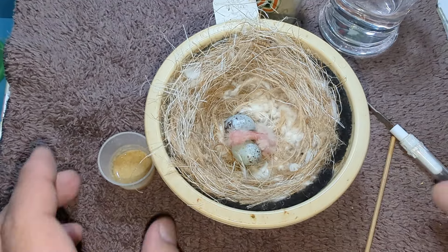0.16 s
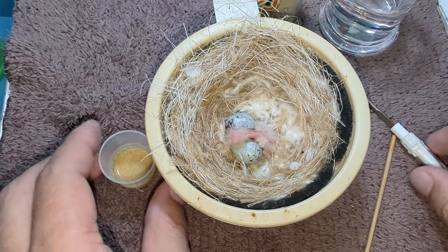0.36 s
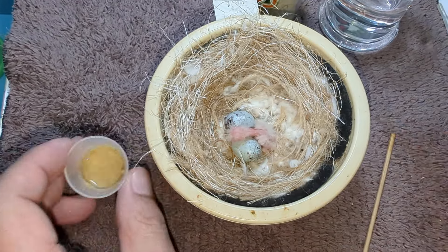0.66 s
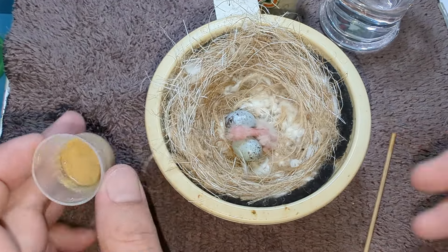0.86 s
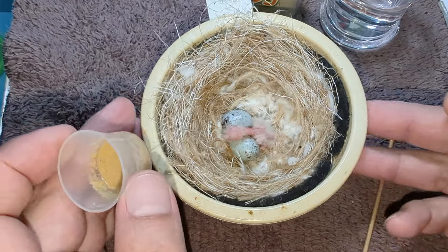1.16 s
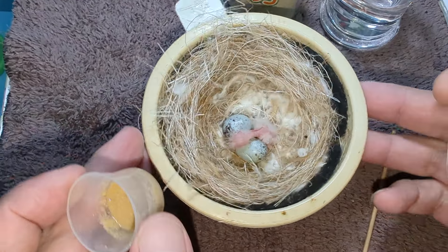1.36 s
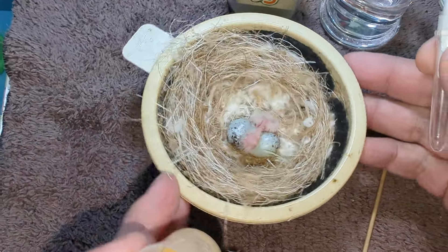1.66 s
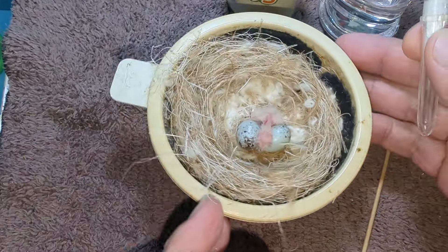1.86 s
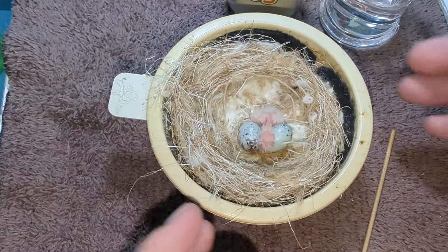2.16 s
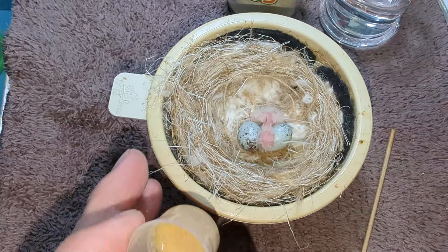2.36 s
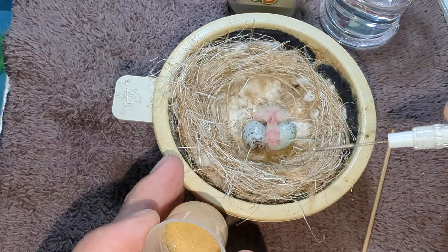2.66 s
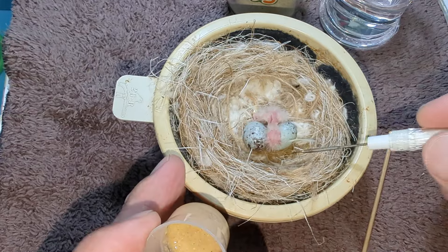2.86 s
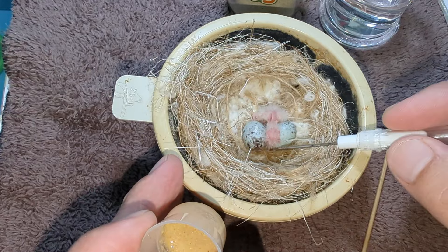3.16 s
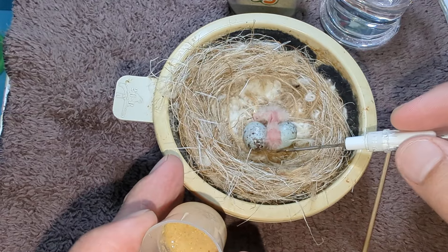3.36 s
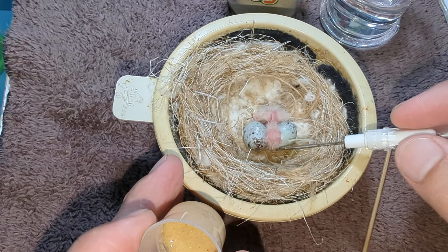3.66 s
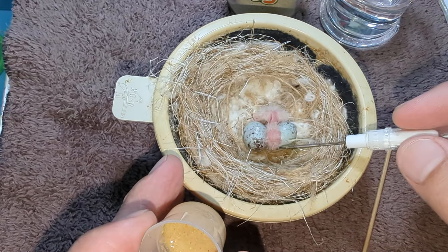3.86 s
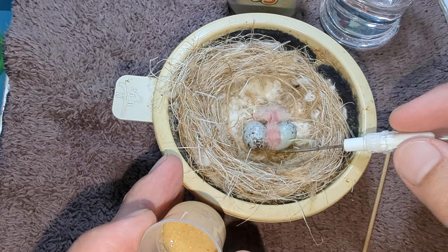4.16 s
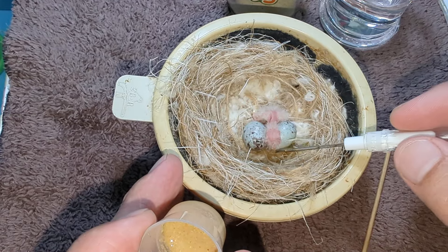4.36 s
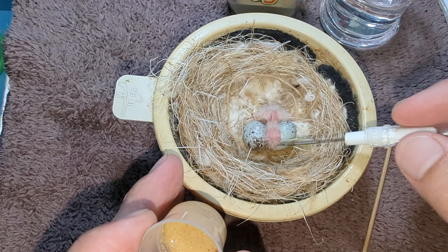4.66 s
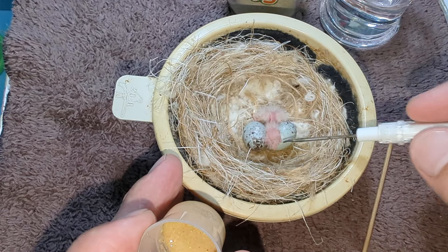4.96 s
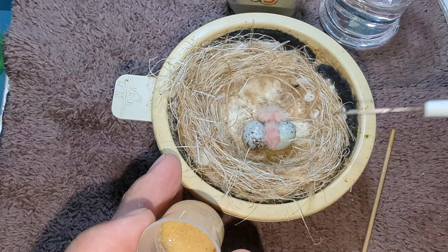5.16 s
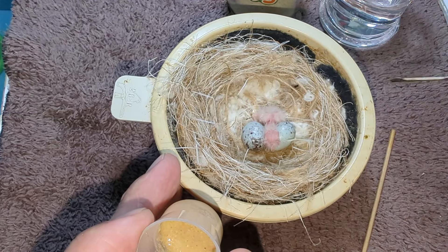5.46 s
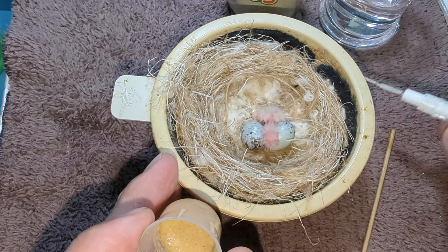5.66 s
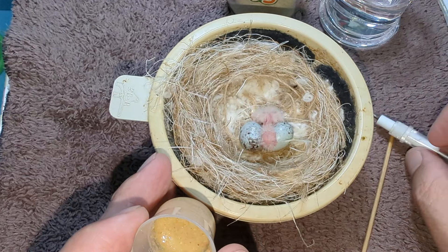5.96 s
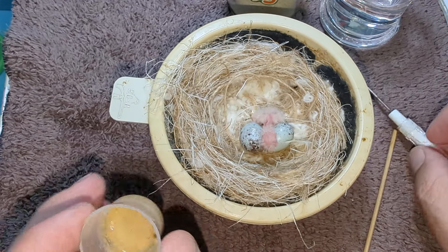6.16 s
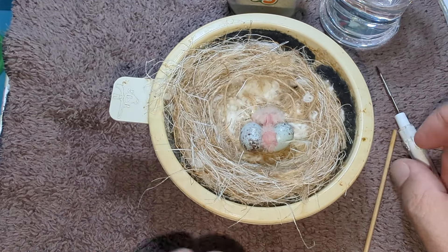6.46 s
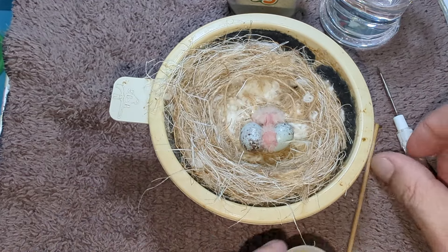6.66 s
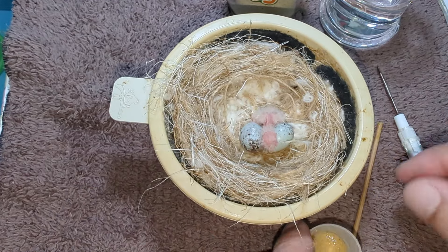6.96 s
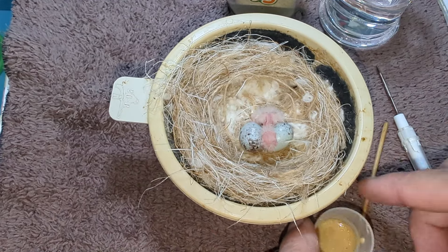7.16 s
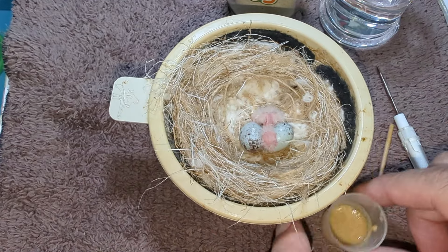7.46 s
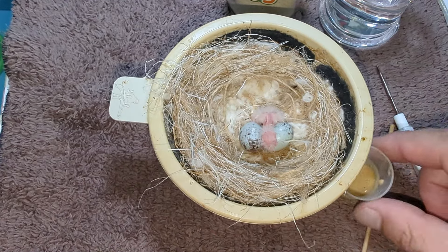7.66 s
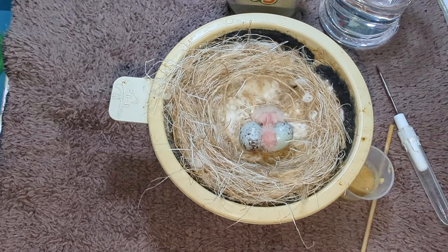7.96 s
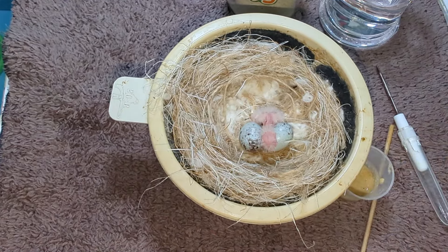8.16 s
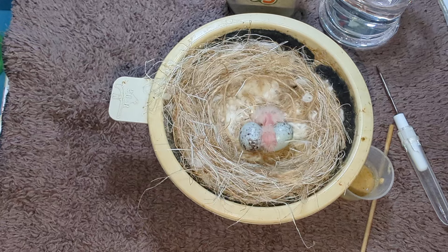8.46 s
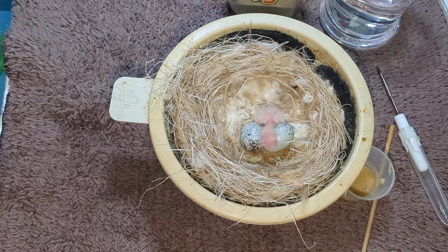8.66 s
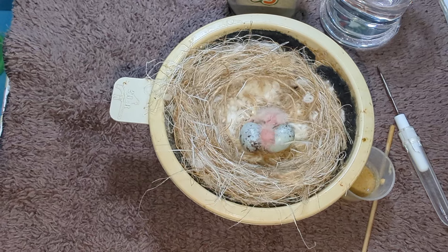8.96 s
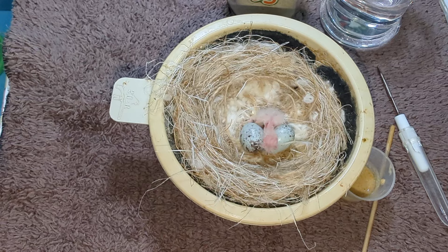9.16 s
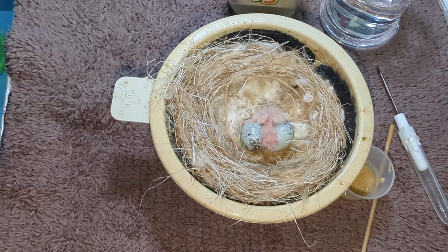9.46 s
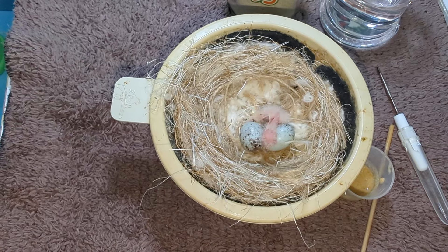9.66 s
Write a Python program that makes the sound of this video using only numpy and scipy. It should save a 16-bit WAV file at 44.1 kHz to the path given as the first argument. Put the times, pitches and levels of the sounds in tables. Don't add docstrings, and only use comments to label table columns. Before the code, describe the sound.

Faint high bird peeps over a low rumble, then a quick run of hard clicking raps with straw crackle, and scattered rising whistles afterwards.

```python
import sys
import numpy as np
from scipy import signal
from scipy.fft import rfft, irfft, next_fast_len
from scipy.io import wavfile
from scipy.ndimage import uniform_filter1d

SR = 44100
rng = np.random.default_rng(int(sys.argv[2]) if len(sys.argv) > 2 else 0)


def attenuation_scalar(level_db):
    decades = np.asarray(level_db, float) / 20
    return 10 ** decades


def to_wav(sig):
    pcm = np.clip(np.atleast_2d(sig), -1, 1) * 32767
    pcm = np.round(pcm).astype(np.int16)
    wavfile.write(sys.argv[1], SR, pcm.T)


N = 432621

# time in seconds, level in dB.
TRAFFIC_LEVEL = [(0.0, -55), (1.04, -52.5), (2.05, -54.5), (3.3, -54), (4.12, -52), (4.8, -49.5),
                 (5.3, -52.5), (6.36, -53), (7.59, -54.5), (8.03, -57.5), (8.93, -55.5), (9.81, -54.5)]
# frequency in Hz, level in dB.
TRAFFIC_TONE = [(15, -43.5), (25, -6), (37, -11), (59, 9), (87, -9.5), (118, -2), (144, -15), (157, -18.5),
                (171, -7), (186, -13), (205, -52), (226, -10.5), (268, -11.5), (385, -19), (450, -20.5),
                (580, -47), (990, -120)]
# frequency in Hz, level in dB.
AIR_TONE = [(210, -52), (350, -11), (482, -5.5), (613, -4), (664, -4.5), (928, -3), (1040, -4), (1680, -5),
            (2710, -7.5), (5660, -20), (6330, -13), (8710, -22), (10100, -32), (14500, -49), (16000, -27)]
AIR_DB = -56.5
# frequency in Hz, likeness from 0 to 1.
PORT_LIKENESS = [(30, 1), (80, 0.92), (300, 0.91), (450, 0.56), (800, 0.45), (1300, 0.068), (2500, 0.22),
                 (6000, 0.037), (15000, 0.06)]
# frequency in Hz, lag in radians.
FLOOR_LAG = [(60, 0.37), (170, 0.53), (400, 0.37), (650, 1.56), (1000, 2.5), (1300, -1.5), (2000, 4),
             (4000, 12)]
# frequency in Hz, width in Hz, level in dB.
MACHINE_HUM = [(104.2, 9, -59.5), (119, 6.7, -64.5), (247, 23, -72), (560, 48, -72), (823, 130, -66),
               (950, 23, -68.5)]
# frequency in Hz, level in dB.
MOTOR_TONES = [(175, -70), (618.8, -71), (738, -73)]

# time in seconds, rustle level in dB.
HANDS = [(0, -76.5), (2.3, -74.5), (2.85, -84), (2.95, -63), (3.5, -73.5), (4.5, -71), (5.0, -72),
         (6.1, -78), (6.6, -77), (7.1, -84.5), (7.5, -77.5), (8.2, -82), (9.81, -101)]
# loudest moment in seconds, level in dB, swell and fade in seconds.
STROKES = [(.52, -67.5, 0.067, 0.35), (1.66, -72, .12, .05), (3.17, -79, .1, .2), (3.38, -72, .1, .1),
           (5.83, -72, .05, .12), (1.96, -67, 0.43, 0.029), (2.34, -73, 0.15, 0.2),
           (2.72, -62.5, 0.054, 0.11), (3.66, -67, 0.1148, 0.2), (4.62, -63.5, 0.031, 0.25),
           (5.14, -74, 0.0831, 0.386), (5.42, -69, .03, .15), (5.58, -61, 0.024, 0.1078),
           (5.71, -63.5, 0.016, 0.056), (6.06, -66.5, 0.54, 0.099), (6.31, -75.5, 0.042, 0.09),
           (7.44, -72, 0.08, 0.0949), (7.56, -70, 0.079, 0.31), (7.97, -75.5, .05, 0.353),
           (8.31, -67, 0.0548, 0.1208), (8.61, -74.5, 0.074, 0.2), (9.1, -74.5, 0.44, 0.76),
           (9.56, -73.5, 0.0876, 0.17)]
# frequency in Hz, level in dB per Hz.
RUSTLE_TONE = [(880, -29), (1500, -10), (1710, 9.5), (1850, 2), (3450, 0), (4970, -2.5), (5600, -1),
               (8830, 2), (10000, -2.5), (13700, -5.5), (16000, -11)]

# top in seconds, level in dB, top pitch in Hz, overtone in dB, hold in seconds.
ARCHES = [(0.281, -57, 5120, -34, 0.012), (1.038, -56.5, 5590, -27.5, 0.0086),
          (1.221, -56.5, 5480, -27.5, 0.014), (3.04, -50, 5300, -31, 0.015),
          (4.139, -53.5, 5500, -15.5, 0.0047), (4.361, -52, 5820, -9.5, 0.0054),
          (4.652, -53, 5490, -18.5, 0.0088), (4.809, -53.5, 5500, -10, 0.011),
          (4.933, -52.5, 5460, -9.5, 0.014), (5.058, -51.5, 5140, -8.5, .012),
          (5.182, -51, 5190, -7, 0.013), (5.308, -52, 5170, -7, 0.011), (5.42, -51, 5020, -8.5, 0.014),
          (5.541, -52, 5160, -11, 0.012), (5.667, -54, 5380, -14, 0.015), (5.804, -52, 5050, -11.5, 0.019),
          (5.948, -51, 5170, -10.5, 0.0105), (9.132, -55, 5080, -24, 0.017),
          (9.253, -54.5, 4980, -17.5, 0.02)]
# top in seconds, level in dB, top pitch in Hz, overtone in dB.
PIPS = [
    (3.381, -53.5, 5430, -16),
    (1.579, -59, 5430, -5),
    (1.705, -58, 5600, -6),
    (1.837, -59, 5300, -8),
    (1.948, -59.5, 5370, -3),
    (2.086, -60.5, 5260, -6),
    (2.241, -58.5, 5140, -7),
]
# top in seconds, level in dB, top pitch in Hz, overtone in dB.
SLURS = [
    (6.82, -62, 4880, -24),
    (6.952, -59.5, 5100, -19),
    (7.112, -65, 4980, -20),
    (6.125, -70, 4950, -20),
    (6.27, -65, 4950, -20),
    (6.39, -69, 4600, -18),
    (6.51, -66, 4900, -17),
]
# top in seconds, level in dB, top and overtone in Hz and dB, foot in Hz.
RISERS = [(3.572, -46.5, 5100, -14, 3300), (1.647, -56, 6880, -30, 6250), (1.89, -51.5, 6880, -30, 5960),
          (2.62, -57.5, 6430, -30, 5430), (5.817, -44.5, 6600, -15, 4700), (5.955, -40.5, 6950, -18, 5070),
          (6.662, -46.5, 4916, -24, 3160), (7.518, -48.5, 4574, -21, 3270), (7.839, -60.5, 6440, -28, 5930),
          (8.02, -58.5, 5150, -30, 4200), (8.256, -49, 4860, -21, 3200), (9.55, -49, 5260, -25, 3600)]
ARCH_FOOT_HZ, PIP_FOOT_SHARE = 4220, .83
FOOT_HZ_PER_DB = 19.5
PIP_HOLD_S, RISER_HOLD_S = 0.017, 0.015
# time in seconds, left minus right in dB.
BIRD_PAN = [(0, .6), (1.5, 4), (3, 2.5), (4.6, 2.5), (5.7, 1), (5.9, 5.5), (6.2, 2.5), (9.8, 1.5)]
# frequency in Hz, 60 dB decay time in seconds.
ROOM_DECAY = [(300, 0.42), (1500, 0.2), (5000, 0.28), (9000, 0.28), (15000, 0.076)]

# start in seconds, level in dB, pitch and width in Hz,
# length in seconds.
SCUFFS = [(0.505, -56, 1290, 350, 0.1), (1.402, -49, 5870, 2500, 0.0026), (1.4085, -45, 5000, 3000, 0.0028),
          (2.583, -53, 4077, 400, 0.015), (2.874, -39.5, 8660, 600, 0.015), (2.877, -30, 9000, 500, 0.0046),
          (2.87, -30.5, 6100, 1580, 0.022), (2.944, -53, 330, 299, 0.087), (2.96, -53, 183, 30, 0.15),
          (3.157, -55.5, 433, 200, 0.022), (3.481, -44.5, 246, 90, 0.028), (3.281, -45, 505, 121, .02),
          (3.45, -48, 2720, 300, .012), (5.193, -49, 3250, 250, 0.034), (5.499, -59, 2610, 200, .09),
          (5.108, -58, 3700, 200, .12), (5.695, -63, 2700, 200, .05), (7.79, -60, 3670, 200, .05),
          (5.988, -53.5, 1600, 500, 0.052), (5.998, -57.5, 494, 700, 0.0556),
          (6.341, -56, 2720, 500, 0.09556), (6.428, -56, 494, 200, 0.035), (4.321, -46, 516, 250, .016),
          (6.435, -52.5, 2640, 650, 0.1), (7.781, -61.5, 840, 200, 0.0892), (8.697, -63, 1650, 192, 1.16)]
# frequency in Hz, left minus right in dB.
NEAR_PAN = [(200, -1), (1300, -4.5), (2400, 2.5), (4400, -7.5), (9000, 9.5), (12500, -19.5), (15000, 12)]
NEAR_LAG_S = 0.0001277

# time in seconds, peak, brightness and bowl ring in dB, bowl ring in Hz.
BLOWS = [(1.402, -30.5, -30, -7, 2400), (2.885, -20.5, -6, -19, 2650), (3.0662, -21, 6, -3, 2700),
         (3.0716, -32, 14, -3, 2750), (3.0797, -12.5, -6, -4.5, 2650), (3.0836, -21.5, -8, -6, 2700),
         (3.269, -27, 3.5, 3, 2730), (3.2732, -33, -8, 23, 2700), (3.279, -22.5, -10, 10, 2420),
         (3.282, -13, -8, 3, 2760), (3.287, -20, -8, -3, 2860), (3.462, -26.5, 3, 12, 2590),
         (3.4674, -24, -6, 21, 2700), (3.4728, -27, 1, 18, 2630), (3.481, -13.5, 0, 12.5, 2570),
         (3.4855, -14.5, -2, 8, 2610), (3.488, -21, -13.5, -15, 2670), (3.679, -22, -4, -6, 2810),
         (3.857, -31.5, 3, 11, 2890), (3.865, -34, -15, 10, 2070), (3.8745, -30, -8, 9, 2600),
         (3.884, -11.5, 0, -1.5, 2510), (3.8872, -19.5, -16, -9, 3000), (4.1069, -16, -3, 5.5, 2860),
         (4.112, -21.5, -10, 8, 3320), (4.2825, -39, -3, 3, 2960), (4.289, -31, -9, 11, 2870),
         (4.3107, -26, -4.5, 6.5, 2270), (4.314, -16, 6, 9, 2650), (4.3197, -8, 1, 1.5, 2840),
         (4.3269, -20.5, -3, 2, 3420), (4.3341, -33, -6.5, 5.5, 3200)]
# loudest moment in seconds, level in dB, lead-in in seconds,
# brightness and bowl ring in dB.
CRACKLE = [
    (2.885, -40, 0.017, 7, 0),
    (3.08, -35.5, 0.023, 2, 2),
    (3.281, -33.5, .024, -7, 8.5),
    (3.486, -35, 0.023, -10, -9),
    (3.683, -38, 0.013, -4, 5),
    (3.886, -38.5, .035, -9, 2),
    (4.11, -44.5, 0.026, 0, 9.5),
    (4.315, -44, 0.037, -7, 4),
]
# time in seconds, peak in dB.
STRAW_SNAPS = [(2.697, -50.5), (3.4475, -48), (4.0905, -49), (4.099, -42), (4.1025, -38), (5.465, -50),
               (5.4051, -46), (5.572, -40), (5.58, -36), (5.6194, -42), (5.7118, -46), (6.0194, -43)]
# time in seconds, thud in dB, low and middle mode in Hz, middle mode in dB.
SPOTS = [
    (1.4, 0, 840, 1600, -7),
    (2.885, -16, 1090, 1350, -1),
    (3.08, -8, 820, 1690, -5),
    (3.28, -10, 1040, 1820, 2),
    (3.48, 5, 850, 1750, -4),
    (3.68, 0, 1210, 1650, -1),
    (3.885, 8, 800, 1790, 13),
    (4.11, -4, 1010, 1700, -13),
    (4.32, 6, 990, 1440, 4),
]
# frequency in Hz, width in Hz, level in dB.
BOWL_LOW = [(274, 33, -5), (840, 470, -1.5), (1600, 640, 0.5), (2150, 480, 2.5), (3600, 59, 5)]
# frequency in Hz, width in Hz, level in dB.
TOOL_HIGH = [(6100, 1100, 5.5), (7950, 600, 15.5), (8910, 510, 12), (10820, 620, 21), (12700, 1760, 5),
             (15182, 1000, -9)]
RING_WIDTH_HZ = 340
LEAD_DB, HOLD_S, SETTLE_S, SETTLE_DB, TAIL_S, TAIL_DB = -10, 0.0038, 0.02, -27.5, 0.052, -31
EDGE_BRIGHT_DB = 11

# time in seconds, pitch in Hz, level in dB, overtone in dB.
SQUEAL_BREATHS = [
    [(2.996, 2680, -45, -56), (3.012, 2596, -45, -58), (3.03, 2600, -56, -59), (3.048, 2740, -44, -48),
     (3.064, 2977, -50, -45.5), (3.092, 2980, -47, -53), (3.103, 2800, -44, -45), (3.111, 2470, -48, -50)],
    [(3.111, 2484, -50, -53), (3.14, 2440, -48, -55), (3.16, 2374, -58, -55), (3.183, 2450, -68, -68)],
    [(3.185, 2605, -54, -62), (3.2, 2740, -46, -51), (3.209, 3100, -51, -56), (3.23, 3020, -58, -70),
     (3.255, 2747, -47, -51), (3.3, 2770, -52, -56), (3.325, 2730, -49, -59), (3.342, 2587, -42, -59),
     (3.36, 2600, -59, -59)],
    [(3.36, 2620, -58, -62), (3.385, 2630, -58, -58), (3.41, 2660, -71, -60), (3.435, 2660, -66, -62),
     (3.455, 2600, -60, -63), (3.47, 2730, -53, -72), (3.51, 2660, -64, -83)],
]
# start and length in seconds, first and last pitch in Hz, level in dB.
SQUEAKS = [
    (4.56, 0.11, 2870, 2200, -64),
    (4.564, 0.089, 2580, 2150, -61),
    (4.6, 0.034, 4270, 4130, -56),
    (4.612, 0.045, 3450, 3370, -62),
    (8.002, 0.085, 2460, 2700, -63.5),
    (9.47, .04, 8400, 8460, -66),
]
# frequency in Hz, level in dB.
MIC_COLOUR = [(5000, -0.61), (7400, -2), (9200, 2.5), (9900, -6), (11000, -1.5), (14000, -1)]


def evened(x):
    return x / np.sqrt(np.mean(x ** 2) + 1e-20)


def read(points, hz):
    f, value = np.transpose(points)
    return np.interp(np.log(hz + 1), np.log(f + 1), value)


def over_time(points):
    return np.interp(np.arange(N) / SR, *np.transpose(points))


def add(mix, s, sound):
    part = mix[round(s * SR):][:len(sound)]
    part += sound[:len(part)]


def resonate(x, hz, width):
    r = np.exp(-np.pi * width / SR)
    pole = r * np.exp(2j * np.pi * hz / SR)
    return 2 * signal.lfilter([1 - r], [1, -pole], x).real


def steep(x, hz, width):
    return resonate(resonate(x, hz, width), hz, width)


def body(x, modes, flip=-1):
    return sum(flip ** k * attenuation_scalar(db) * resonate(x, hz, width) for k, (hz, width, db) in enumerate(modes))


def hiss(tone, level, patchy_db, size):
    frames, hz = 4 * N // size + 5, np.fft.rfftfreq(size, 1 / SR)
    a, b, c, d, patches = rng.standard_normal((frames, len(hz), 5)).T
    patches = uniform_filter1d(patches, size=10, axis=0)
    patches = evened(uniform_filter1d(patches, size=10, axis=1))
    same = np.clip(read(PORT_LIKENESS, hz), 0, 1)[:, None]
    left = a + 1j * b
    late = left * np.exp(-1j * read(FLOOR_LAG, hz))[:, None]
    right = same * late + np.sqrt(1 - same ** 2) * (c + 1j * d)
    spectra = np.array([left, right]) * attenuation_scalar(read(tone, hz)[:, None] + patchy_db * patches)
    noise = signal.istft(spectra, nperseg=size, noverlap=3 * size // 4)[1][:, :N]
    return evened(noise) * attenuation_scalar(over_time(level))


def hum():
    tones = np.zeros(N)
    for hz, width, db in MACHINE_HUM:
        tones += attenuation_scalar(db) * evened(resonate(rng.standard_normal(N), hz, width))
    for hz, db in MOTOR_TONES:
        drift = np.interp(np.arange(N), np.linspace(0, N, num=40), rng.standard_normal(40))
        turn = 2 * np.pi * np.cumsum(hz * (1 + 0.003007 * drift)) / SR
        tones += np.sqrt(2) * attenuation_scalar(db + 2.0 * drift) * np.sin(turn)
    return np.array([tones, np.roll(tones, shift=13)])


def rustle():
    t = np.arange(0, N / SR, .005)
    power = attenuation_scalar(np.interp(t, *np.transpose(HANDS))) ** 2
    for s, db, swell, fade in STROKES:
        away = np.maximum((s - t) / swell, (t - s) / fade)
        power = power + attenuation_scalar(db - 18 * away) ** 2
    level = np.transpose([t, 10 * np.log10(power)])
    return hiss(RUSTLE_TONE, level, patchy_db=3.0, size=256)


def whistle(hz, db, overtone_db, wobble):
    shake = evened(uniform_filter1d(rng.standard_normal(len(hz)), size=60))
    turn = 2 * np.pi * np.cumsum(hz * (1 + wobble * shake)) / SR
    return np.sqrt(2) * (attenuation_scalar(db) * np.sin(turn) + attenuation_scalar(overtone_db) * np.sin(2 * turn))


def peep(row, hold, foot_hz, drop, fall, shape_db, growth_db, octave_shape_db=(0, 0, 0, 0)):
    s, db, top_hz, overtone_db = row
    rise = .022
    t = np.arange(-rise, hold + fall, 1 / SR)
    corners = [-rise, 0, hold, hold + fall]
    sag = np.clip(-t / rise, 0, 1) ** 1.9 + drop * np.clip((t - hold) / fall, 0, 1) ** 1.31
    sag += 0.1415 * np.clip(t / hold, 0, 1) ** 2
    effort_db = db + np.interp(t, corners, shape_db)
    octave_db = effort_db + overtone_db + growth_db * np.minimum(t - hold, 0)
    octave_db = octave_db + np.interp(t, corners, octave_shape_db)
    voice = whistle(top_hz - (top_hz - foot_hz) * sag, effort_db, octave_db, wobble=0.0017)
    return s - rise, voice * signal.windows.tukey(len(t), .15)


def birds():
    out = np.zeros(N)
    for *row, hold in ARCHES:
        foot_hz = ARCH_FOOT_HZ + FOOT_HZ_PER_DB * row[3]
        add(out, *peep(row, hold, foot_hz, drop=1.19, fall=0.0155,
                       shape_db=[1.5, -3.5, 4.5, -1.5], growth_db=401.5))
    for row in PIPS:
        add(out, *peep(row, PIP_HOLD_S, PIP_FOOT_SHARE * row[2], drop=1.22, fall=0.0126,
                       shape_db=[2.0, -11, 8, 4.0], growth_db=30, octave_shape_db=[-4, 12, -4, -15]))
    for row in SLURS:
        add(out, *peep(row, PIP_HOLD_S, ARCH_FOOT_HZ, drop=0.94, fall=0.0226,
                       shape_db=[-41, 0.5, -7.0, 6], growth_db=29))
    for *row, foot_hz in RISERS:
        add(out, *peep(row, RISER_HOLD_S, foot_hz, drop=0.85, fall=0.0174,
                       shape_db=[-9.0, 0.0, -2.0, -18], growth_db=-250))
    return out


def room(x):
    taps = np.zeros((2, SR // 2))
    at = np.arange(100, SR // 2 - 20, 20) + rng.integers(0, 20, (2, (SR // 2 - 101) // 20))
    np.put_along_axis(taps, at, rng.choice([-1., 1.], at.shape), 1)
    hz, t, z = signal.stft(taps, SR, nperseg=128)
    decay = attenuation_scalar(-60 * t / read(ROOM_DECAY, hz)[:, None])
    tail = signal.istft(z * decay, SR, nperseg=128)[1]
    return signal.fftconvolve(x[None], tail / np.linalg.norm(tail[0]), axes=1)[:, :N]


def scuffs():
    out = np.zeros(N)
    for s, db, hz, width, length in SCUFFS:
        puff = steep(rng.standard_normal(round(length * SR)), hz, width)
        add(out, s, attenuation_scalar(db) * evened(puff) * signal.windows.tukey(len(puff), .4))
    return out


def ports(x):
    size = next_fast_len(N)
    hz = np.fft.rfftfreq(size, 1 / SR)
    half = attenuation_scalar(read(NEAR_PAN, hz) / 2)
    left = half * np.exp(-2j * np.pi * hz * NEAR_LAG_S)
    return irfft(rfft(x, size) * np.array([left, 1 / half]), size)[:, :N]


def tool(x):
    out = attenuation_scalar(-8.5) * body(x, TOOL_HIGH)
    for hz, width, db in TOOL_HIGH:
        shift, sway = rng.standard_normal(2)
        out = out + attenuation_scalar(db + 3 * sway) * steep(x, hz * (1 + .015 * shift), 1.32 * width)
    return out


def struck(x, s, bright_db, ring_db, ring_hz):
    _, thud_db, low_hz, middle_hz, middle_db = min(SPOTS, key=lambda spot: abs(spot[0] - s))
    thud, low, middle, *rest = BOWL_LOW
    modes = [(*thud[:2], thud[2] + thud_db), (low_hz, *low[1:]),
             (middle_hz, middle[1], middle[2] + middle_db), *rest]
    bowl = evened(uniform_filter1d(body(x, modes, flip=1.0), size=6))
    ring = resonate(resonate(x, ring_hz, RING_WIDTH_HZ), ring_hz, 2 * RING_WIDTH_HZ)
    return bowl + attenuation_scalar(ring_db) * evened(ring) + attenuation_scalar(bright_db - 2.0) * evened(tool(x))


def raps():
    out, t = np.zeros(N), np.arange(1500) / SR
    for s, db, *colour in BLOWS:
        rebounds = rng.standard_normal(len(t)) * (rng.random(len(t)) < .1) * 0.63 * np.exp(-t / 0.0027)
        blow = struck(rebounds + (t == 0), s, *colour)
        add(out, s + .0006, -attenuation_scalar(db + 2.5) * blow / abs(blow).max())
    return out


def crackle():
    out = np.zeros(N)
    blow_s, *_, blow_hz = np.transpose(BLOWS)
    for s, db, lead, bright_db, ring_db in CRACKLE:
        u = np.arange(-lead, TAIL_S, 1 / SR)
        under_db = np.interp(u, [-lead, -HOLD_S, HOLD_S, HOLD_S + SETTLE_S, TAIL_S],
                             [LEAD_DB, 0, 0, SETTLE_DB, TAIL_DB])
        snaps = rng.standard_normal(len(u)) * (0.1 + (rng.random(len(u)) < .04))
        edge_db = bright_db + EDGE_BRIGHT_DB * under_db / TAIL_DB
        sound = struck(snaps, s, edge_db, ring_db, np.interp(s - lead, blow_s, blow_hz))
        add(out, s - lead, sound * attenuation_scalar(db + under_db - 1.0) * signal.windows.tukey(len(u), .1))
    return out


def straw_snaps():
    out, t = np.zeros(N), np.arange(1500) / SR
    for s, db in STRAW_SNAPS:
        snap = body(rng.standard_normal(len(t)) * np.exp(-t / 0.0015), TOOL_HIGH)
        add(out, s, attenuation_scalar(db) * snap / abs(snap).max())
    return out


def squeal():
    out = np.zeros(N)
    for rows in SQUEAL_BREATHS:
        s, *columns = np.transpose(rows)
        t = np.arange(s[0], s[-1], 1 / SR)
        flutter = attenuation_scalar(4.0 * evened(uniform_filter1d(rng.standard_normal(len(t)), size=250)))
        voice = whistle(*(np.interp(t, s, c) for c in columns), wobble=.011)
        add(out, s[0], voice * flutter * signal.windows.tukey(len(t), .03))
    return out


def squeaks():
    out = np.zeros(N)
    for s, length, first_hz, last_hz, db in SQUEAKS:
        u = np.arange(0, 1, 1 / (length * SR))
        hz = first_hz + (last_hz - first_hz) * u ** 3.5
        octave_db = db - 5 * (4300 / hz) ** 3
        add(out, s, whistle(hz, db, octave_db, wobble=0.0039) * signal.windows.tukey(len(u), .2))
    return out


def scene():
    traffic = hiss(TRAFFIC_TONE, TRAFFIC_LEVEL, patchy_db=2.0, size=4096)
    air = hiss(AIR_TONE, [(0, AIR_DB), (10, AIR_DB)], patchy_db=1.6, size=1024)
    floor = traffic + air + hum() + attenuation_scalar(12.0) * rustle()
    far, cry = birds(), squeal()
    near = scuffs() + raps() + crackle() + straw_snaps()
    voices = attenuation_scalar(-5.5) * far + attenuation_scalar(-3) * cry + squeaks()
    voices = voices + attenuation_scalar(1.0) * room(far + attenuation_scalar(-1) * cry)
    side = attenuation_scalar(over_time(BIRD_PAN) * [[.5], [-.5]])
    return voices * side + ports(near) + attenuation_scalar(-15) * room(near) + floor


def low_pass(x):
    return signal.sosfilt(signal.butter(12, 16510, fs=SR, output="sos"), x)


def record(dry):
    low_cut = signal.sosfilt(signal.butter(4, 36, "high", fs=SR, output="sos"), dry)
    hz = np.linspace(0, SR / 2, num=257)
    port = signal.firwin2(255, hz, attenuation_scalar(read(MIC_COLOUR, hz)) * (hz < 15900), fs=SR)
    return low_pass(signal.oaconvolve(low_cut, port[None], "same"))


dry = scene()
out = record(dry)
to_wav(out)
```